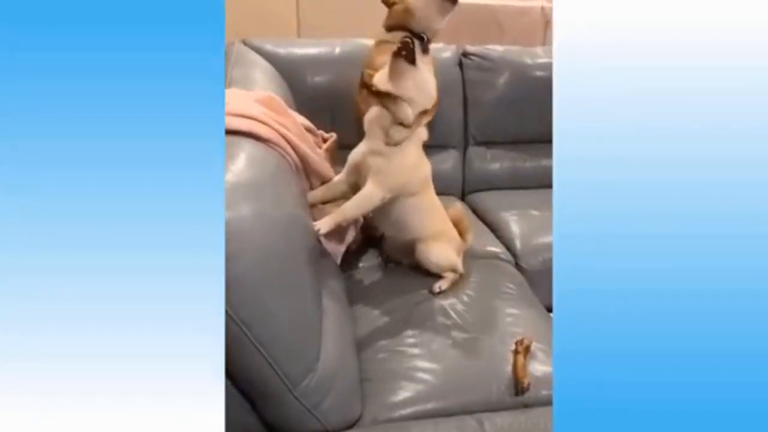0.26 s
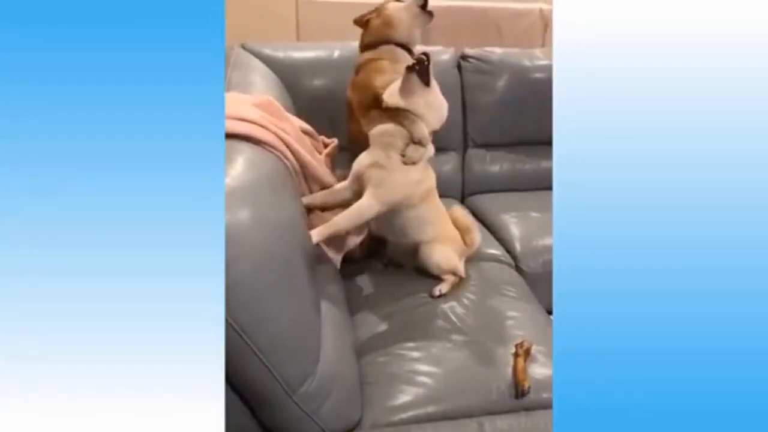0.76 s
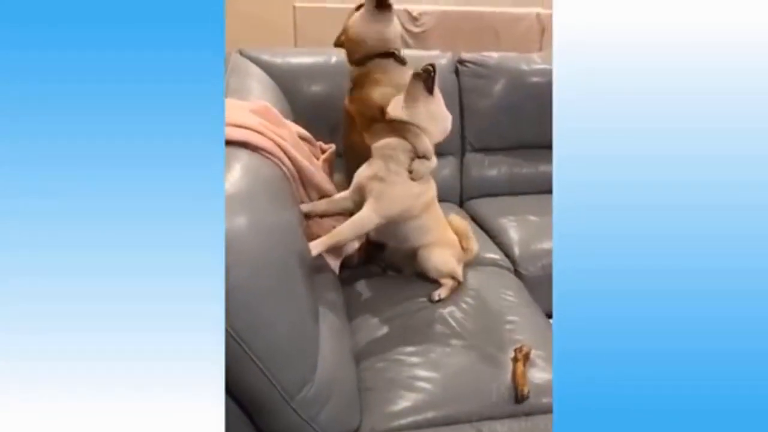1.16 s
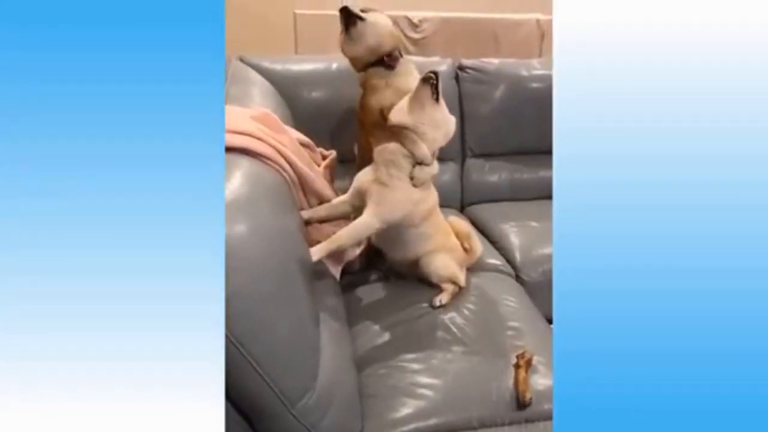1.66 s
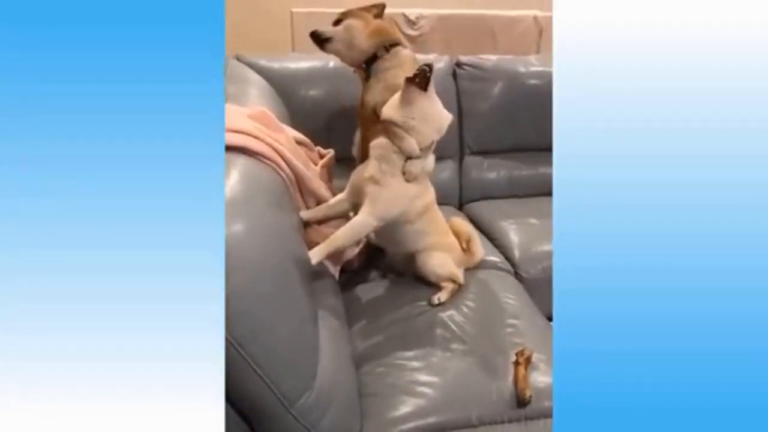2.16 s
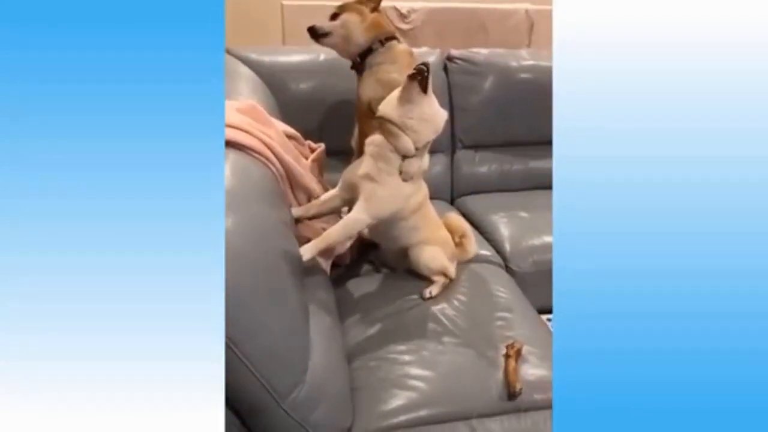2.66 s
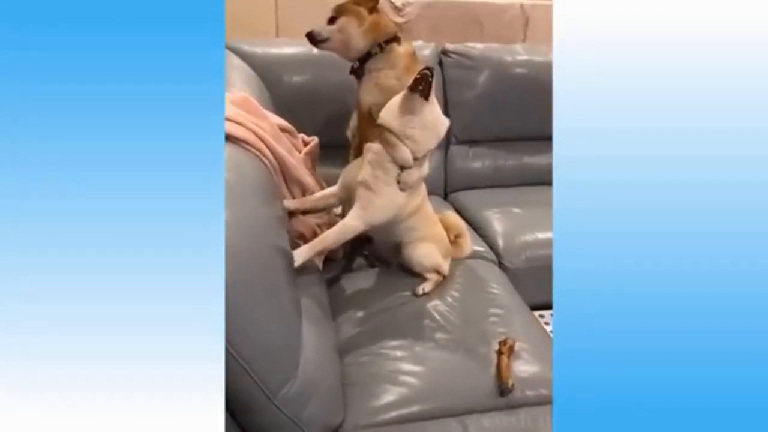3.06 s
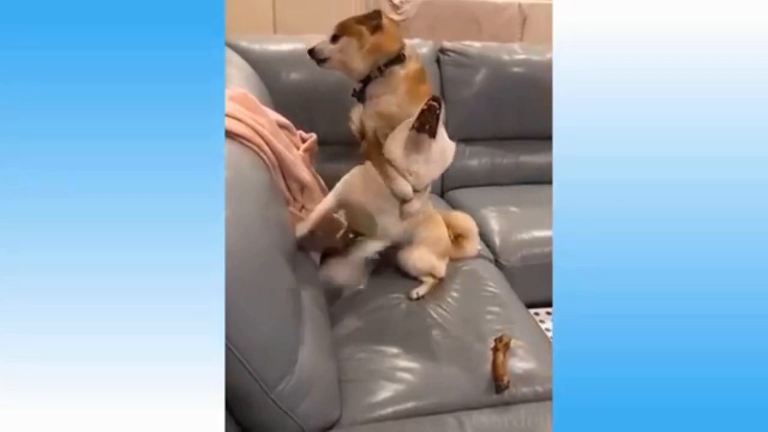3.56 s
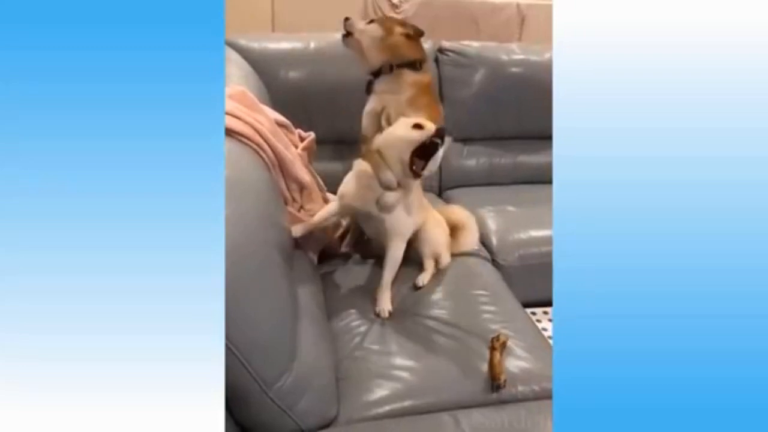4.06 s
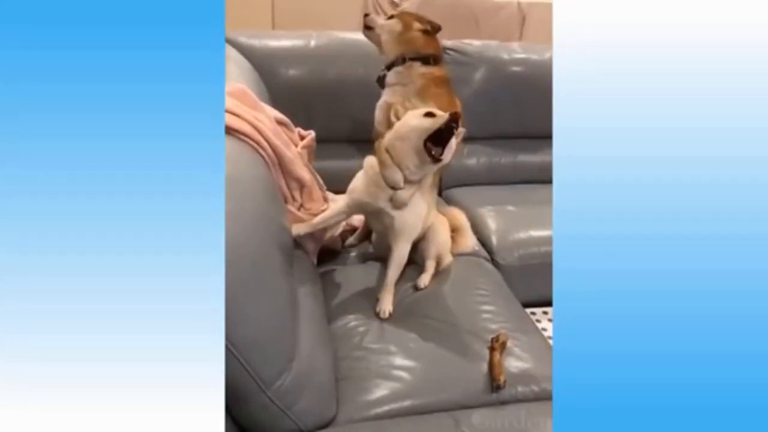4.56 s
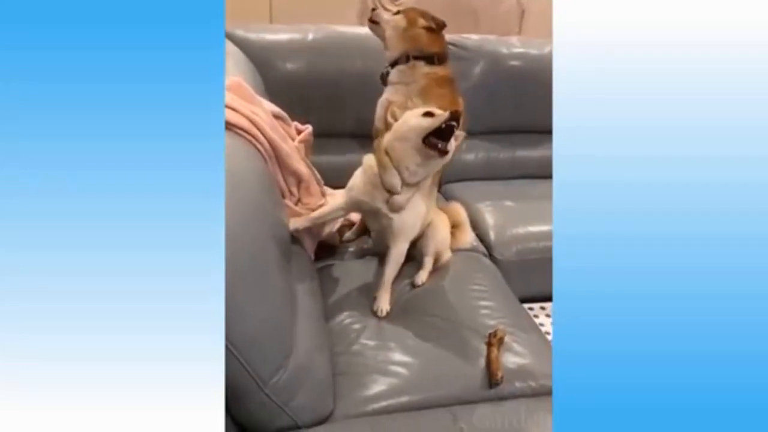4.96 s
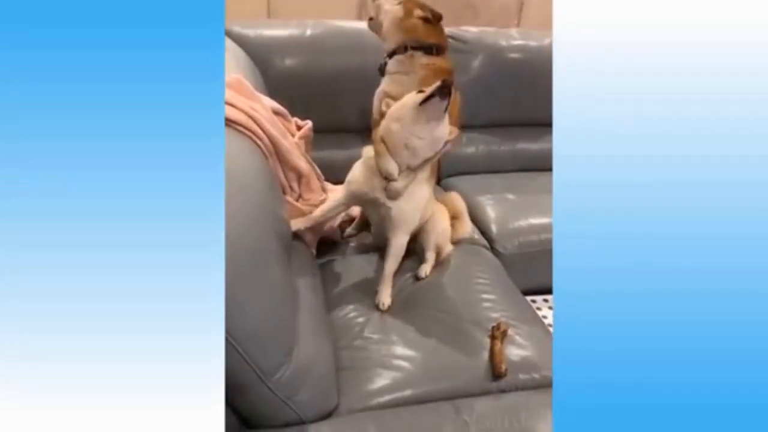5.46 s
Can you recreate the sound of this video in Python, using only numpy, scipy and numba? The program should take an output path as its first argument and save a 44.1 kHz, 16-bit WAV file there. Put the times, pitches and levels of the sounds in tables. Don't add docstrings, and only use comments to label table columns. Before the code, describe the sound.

Two dogs bark loudly in a reverberant living room. The clear front dog opens with two short barks at about 0.1 and 0.4 seconds, each gliding upward. The hoarse rear dog, higher and full of rushing air, answers with five quick yaps from 0.55 to 1.45. The echo rings down over a short pause. From 2.0 to 3.4 the front dog barks about every 0.3 seconds, with one rasping bark from the other at 2.2. At 3.8 a brighter, piercing yelp bursts out, followed by more clear barks until 4.9, with hoarse ones at 3.9 and 4.2. After another ringing gap, a hoarse bark at 5.4 leads into a last rising yelp at 5.5 and a weaker hoarse bark near 5.65. Very faint closed-mouth moans and a low house hush sit underneath. The small microphone overloads on peaks, with slight bass thumps and patchy treble.

```python
import sys
import numpy as np
from scipy import signal
from scipy.fft import rfft, irfft
from scipy.io import wavfile
from scipy.ndimage import uniform_filter1d, minimum_filter1d
from numba import njit

SR = 44100
rng = np.random.default_rng(int(sys.argv[2]) if len(sys.argv) > 2 else 0)


def output_pcm(signal):
    pcm = np.clip(np.atleast_2d(signal).T, -1, 1) * 32767
    wavfile.write(sys.argv[1], SR, np.round(pcm).astype(np.int16))


def amplitude_ratio(level_db):
    exponent = np.asarray(level_db, float) / 20
    return 10 ** exponent


N = 251811

WAKE_S, WAKE_DB, WAKE_PITCH = 0.016, -18, 0.85


def at_hz(points, hz):
    points_hz, values = np.array(points).T
    return np.interp(np.log(hz + 1), np.log(points_hz), values)


def coloured(x, spectrum):
    size = 4096
    hz = np.arange(size // 2 + 1) * SR / size
    cepstrum = irfft(np.log(amplitude_ratio(at_hz(spectrum, hz))))
    cepstrum[1:size // 2] *= 2
    cepstrum[size // 2 + 1:] = 0
    response = irfft(np.exp(rfft(cepstrum)))
    return signal.fftconvolve(x, response)[:len(x)]


def above(x, hz):
    return signal.sosfilt(signal.butter(3, hz, "high", fs=SR, output="sos"), x)


def wobble(rate_hz):
    x = signal.sosfilt(signal.butter(2, rate_hz, fs=SR, output="sos"), rng.standard_normal(N))
    return x / x.std()


def evened(x, span_s):
    return x / np.sqrt(uniform_filter1d(x ** 2, int(span_s * SR)) + 1e-12)


def in_time(calls, fade_s):
    t = np.arange(N) / SR
    point_s, *columns = np.concatenate(calls).T
    controls = [np.interp(t, point_s, column) for column in columns]
    gate = 0
    for call in calls:
        start_s, end_s = call[0][0], call[-1][0]
        gate = gate + np.clip(np.minimum(t - start_s, end_s + fade_s - t) / fade_s, 0, 1)
    starts = np.array([call[0][0] for call in calls])
    which = np.clip(np.searchsorted(starts, t) - 1, 0, None)
    return controls, np.minimum(gate, 1) ** 2, which, t - starts[which]


def quiet_house():
    # (frequency [Hz], level [dB per Hz])
    hush_spectrum = [(30, -41), (100, -24), (200, -12.5), (500, -17), (2000, -15.5), (4200, -20.5),
                     (5200, -39), (13000, -60)]
    quiet = coloured(rng.standard_normal(N), hush_spectrum)
    return amplitude_ratio(-52) * quiet / quiet.std()


@njit
def moving_resonance(x, centre, r):
    y = np.zeros(len(x))
    for i in range(2, len(x)):
        drive = (1 - r * r) / 2 * (x[i] - x[i - 2])
        y[i] = drive + 2 * r * np.cos(centre[i]) * y[i - 1] - r * r * y[i - 2]
    return y


def bark(calls, roughness, throat, jitter, rasp_db, split_hz, mouth):
    controls, gate, which, age_s = in_time(calls, fade_s=0.0098)
    pitch_hz, level_db, bright_db, hiss_db, *mouth_hz = controls
    rough = np.array(roughness)[which] * np.clip(.45 + age_s / .09, 0, 1)

    shake = jitter * rough * wobble(148.78)
    waver = 0.022 * wobble(18)
    phase = 2 * np.pi * np.cumsum(pitch_hz * (1 + shake + waver)) / SR
    pulses = 0
    for k in range(1, 15):
        fade = 1 + (k * pitch_hz / 5760) ** 4
        pulses = pulses + np.cos(k * phase + .12 * k * k) / fade
    pulses *= 1 + rough * np.cos(phase / 2)
    pulses *= amplitude_ratio(4.4 * rough * wobble(51))
    air = rng.standard_normal(N) * (1 + 0.64 * np.cos(phase))
    air *= amplitude_ratio(rasp_db + 1.25 * wobble(133))

    voice = coloured((1 - rough) * pulses + rough * air, throat)
    for centre_hz, (width_hz, gain_db) in zip(mouth_hz, mouth):
        ring = moving_resonance(voice, 2 * np.pi * centre_hz / SR, np.exp(-np.pi * width_hz / SR))
        voice = voice + amplitude_ratio(gain_db) * ring
    voice = evened(voice, span_s=0.064)

    shut_db = -12 * np.exp(-np.maximum(age_s, 0) / 0.016)
    voice = voice + (amplitude_ratio(bright_db + shut_db) - 1) * above(voice, split_hz)
    voice = voice + (amplitude_ratio(hiss_db + shut_db) - 1) * above(voice, 3550)
    return voice * amplitude_ratio(level_db - 3.5) * gate


def rear_calls():
    # (start [s], length [s], peak level [dB], pitch [Hz], brightness [dB])
    rear_barks = [(-0.05, 0.14, -32.5, 840, -0.3), (0.554, 0.14, -9, 789.5, 0.5),
                  (0.729, 0.15, -8.5, 813.5, -0.5), (0.93, 0.13, -12, 911.2, -3.5),
                  (1.078, 0.16, -12, 895, 0.5), (1.295, 0.17, -13.5, 883.7, 1.5),
                  (2.189, 0.15, -7.5, 803.3, -1), (3.915, 0.175, -9, 801.2, -1.5),
                  (4.17, 0.13, -14.5, 813, -10), (5.369, 0.12, -10, 771.4, 0),
                  (5.656, 0.14, -16.5, 714, -1)]
    peak_share, onset_db, end_db = 0.42, -8.5, -7.5
    onset_pitch, end_pitch = 0.99, 1.04
    edge_bright_db, hiss_db, edge_hiss_db = 3.5, -9.5, -15.5
    calls = []
    for s, length, db, hz, bright_db in rear_barks:
        edge_db = bright_db + edge_bright_db
        calls.append([(s - WAKE_S, hz * WAKE_PITCH, db + onset_db + WAKE_DB, bright_db, hiss_db),
                      (s, hz * onset_pitch, db + onset_db, edge_db, edge_hiss_db),
                      (s + peak_share * length, hz, db, bright_db, hiss_db),
                      (s + length, hz * end_pitch, db + end_db, edge_db, edge_hiss_db)])
    return calls


def rear_dog():
    rear_hoarseness = [.6, .85, .65, .75, .65, .65, .6, .45, .7, .45, .6]
    # (frequency [Hz], level [dB per Hz])
    rear_throat = [(88, -104), (150, -37), (322, -23.5), (419, -25.5), (565, -12), (884, 2), (1110, -6),
                   (2250, -14), (2810, -24.5), (3270, -24), (5020, -35.5), (10000, -37.5), (13000, -41)]
    return bark(rear_calls(), rear_hoarseness, rear_throat, jitter=.2, rasp_db=12, split_hz=760, mouth=[])


def front_calls():
    # (start [s], length [s], peak level [dB], top pitch [Hz], lower mouth resonance [Hz])
    front_barks = [(0.128, 0.182, -7, 559, 1770), (0.359, 0.14, -13.5, 548.4, 1980),
                   (1.998, 0.16, -6.5, 531.5, 1956), (2.325, 0.18, -6.5, 544.1, 1939),
                   (2.644, 0.18, -7, 532, 1810), (2.922, 0.2, -7, 544, 1804), (3.219, 0.198, -6, 545, 1795),
                   (4.03, 0.19, -5, 551.3, 1730), (4.254, 0.165, -8, 548, 1694),
                   (4.491, 0.18, -8, 530.4, 1610), (4.744, 0.15, -8.5, 541.1, 1706)]
    # (time [s], pitch [Hz], level [dB], brightness [dB], lower mouth resonance [Hz])
    clear_yelp = [
        (3.775, 330.6, -39, 1, 1720),
        (3.8, 394, -9.5, 0, 1719),
        (3.826, 501.2, -4.5, 2, 1980),
        (3.86, 511, -4, 10.5, 1580),
        (3.872, 553.2, -1, 12, 1626),
        (3.905, 543.6, -14.5, -6, 1650),
        (3.94, 533.4, -9.5, -2, 1653),
    ]
    # (time [s], pitch [Hz], level [dB], brightness [dB], lower mouth resonance [Hz])
    last_yelp = [
        (5.481, 424, -22, 1.5, 1780),
        (5.495, 455, -7.5, 3.2, 1759),
        (5.52, 514, -5, 6.4, 1730),
        (5.565, 574.5, -7, 1.5, 1680),
        (5.64, 554.6, -14, 1.5, 1710),
        (5.71, 520.3, -18, 1.5, 1700),
    ]
    attack_s, crest_s, onset_db, crest_db, sag_db_per_s = 0.045, 0.08, -12, -1, -66
    onset_pitch, attack_pitch, end_pitch = 0.74, 0.93, 0.94
    jaw_closes_hz_per_s, upper_mouth_hz, upper_lift_hz = 1500, 2806, 80
    bright_db, hiss_db = 2, -8.5

    calls = []
    for yelp in (clear_yelp, last_yelp):
        calls.append([(s, hz, db, yelp_bright_db, 0, mouth_hz, max(upper_mouth_hz, 5.9 * hz))
                      for s, hz, db, yelp_bright_db, mouth_hz in yelp])
    for s, length, db, hz, mouth_hz in front_barks:
        sag_db = sag_db_per_s * (length - crest_s)
        # (age [s], share of top pitch, level change [dB], lift of the upper resonance [Hz])
        shape = [(-WAKE_S, WAKE_PITCH * onset_pitch, WAKE_DB + onset_db, 0),
                 (0, onset_pitch, onset_db, 0),
                 (attack_s, attack_pitch, 0, 0),
                 (crest_s, 1, crest_db, upper_lift_hz),
                 (length, end_pitch, crest_db + sag_db, 0)]
        calls.append([(s + age, hz * share, db + change_db, bright_db, hiss_db,
                       mouth_hz - jaw_closes_hz_per_s * max(age - attack_s, 0), upper_mouth_hz + lift_hz)
                      for age, share, change_db, lift_hz in shape])
    return sorted(calls)


def front_dog():
    front_hoarseness = [.42, .7, .48, .48, .44, .44, .42, .13, .45, .66, .6, .6, .2]
    # (frequency [Hz], level [dB per Hz])
    front_throat = [(88, -50), (150, -61.5), (435, -30.5), (524, -24), (608, -17.5), (820, -15), (1070, -1),
                    (1310, -7), (1640, -15), (2330, -17.5), (3270, -22.5), (5310, -36.5), (6890, -36.5),
                    (9640, -32), (13000, -43.5)]
    # (frequency [Hz], change [dB])
    facing_tone = [(2050, -0.5), (2350, -4.5), (2650, -1), (4300, 2.5), (5400, -11.5), (6500, 5.5),
                   (8000, 1.5), (12000, -4)]
    turn_s = 3.7
    voice = bark(front_calls(), front_hoarseness, front_throat, jitter=.12, rasp_db=9, split_hz=1760,
                 mouth=[(200, 9.8), (400, 0.9)])
    return np.where(np.arange(N) < turn_s * SR, voice, coloured(voice, facing_tone))


def moan_calls():
    # (start [s], length [s], first pitch [Hz], last pitch [Hz], peak level [dB])
    soft_moans = [(0.236, 0.3, 185, 329, -50.5), (1.4, 0.13, 260, 245.3, -52), (2.422, 0.23, 180, 228, -51),
                  (2.842, 0.14, 232, 255, -52), (3.101, 0.13, 260, 212, -50.5),
                  (3.41, 0.1, 262, 173.6, -54), (3.633, 0.16, 199, 212, -66),
                  (4.347, 0.17, 182, 281.8, -54), (4.65, 0.17, 290, 271.8, -54),
                  (4.917, 0.097, 260, 211.5, -51), (5.039, 0.11, 222, 193.2, -56)]
    edge_db, overtone_db = -2, -4.5
    return [[(s, first_hz, db + edge_db, overtone_db),
             (s + length / 2, (first_hz + last_hz) / 2, db, overtone_db),
             (s + length, last_hz, db + edge_db, overtone_db)]
            for s, length, first_hz, last_hz, db in soft_moans]


def moans():
    (pitch_hz, level_db, over_db), gate, *_ = in_time(moan_calls(), fade_s=0.0057)
    phase = 2 * np.pi * np.cumsum(pitch_hz * (1 + 0.013 * wobble(38))) / SR
    overtones = np.sin(2 * phase) + .3 * np.sin(3 * phase)
    hum = np.sin(phase) + amplitude_ratio(over_db) * overtones
    return hum * amplitude_ratio(level_db + 4 + 3 * wobble(30)) * gate


def room(x):
    # (frequency [Hz], time [s])
    echo_times = [(150, 1), (500, 0.97), (1000, 0.91), (2000, 0.84), (4000, 0.77), (8000, 0.91),
                  (12000, 0.43)]
    first_wall_s, build_up_s = 0.0049, 0.0075
    t = np.arange(int(1.3 * SR)) / SR
    band_edges = 100 * 2 ** np.arange(0, 7.6, .5)
    white = rng.standard_normal((2, len(t)))
    tail = 0
    for k, (low, high) in enumerate(zip(band_edges, band_edges[1:])):
        band = signal.sosfilt(signal.butter(2, [low, high], "band", fs=SR, output="sos"), white[k % 2])
        tail = tail + band * amplitude_ratio(-60 * t / at_hz(echo_times, np.sqrt(low * high)))
    tail *= np.clip((t - first_wall_s) / build_up_s, 0, 1)
    return signal.fftconvolve(x, tail / np.sqrt(np.sum(tail ** 2)))[:N]


def puffs(voices):
    loudness = np.sqrt(np.abs(uniform_filter1d(voices ** 2, int(0.068 * SR))))
    low = coloured(rng.standard_normal(N),
                   [(25, -4), (100, -5.5), (250, 11.5), (450, 2.5), (700, -26.0), (2000, -61)])
    return amplitude_ratio(-42 + 0.77 * wobble(1.7)) * loudness * low / low.std()


def scene():
    quiet = quiet_house()
    voices = rear_dog() + front_dog()
    hum = moans()
    echo = amplitude_ratio(-3) * room(voices + amplitude_ratio(-20) * hum)
    air = puffs(voices + echo)
    return (voices + echo + hum + air + quiet)[None]


def overloaded(x):
    push = x ** 4 / (1 + x ** 4)
    thump = signal.sosfilt(signal.butter(2, 160, fs=SR, output="sos"), push)
    bass_cut = signal.butter(2, 47, "high", fs=SR, output="sos")
    return signal.sosfilt(bass_cut, x + amplitude_ratio(-23) * thump)


def blotched(x, from_hz, blotch_db, hole_db, rarity):
    hz, _, tiles = signal.stft(x, SR, nperseg=512)
    chance = uniform_filter1d(rng.standard_normal(tiles.shape), size=5, axis=0)
    chance = uniform_filter1d(chance, size=5, axis=1)
    chance /= chance.std()
    height = np.clip((hz[:, None] - from_hz) / 9000, 0, 1)
    muted = np.clip(3 * (1.8 * height - rarity - chance), 0, 1) * (height > 0)
    blotches = blotch_db * chance * np.minimum(4 * height, 1)
    gain = amplitude_ratio(blotches + hole_db * muted)
    return signal.istft(tiles * gain, SR, nperseg=512)[1][:N]


def limited(x, hold_s):
    ceiling = .93
    size = int(hold_s * SR)
    allowed = minimum_filter1d(np.minimum(1, ceiling / (np.abs(x) + 1e-9)), size)
    return x * uniform_filter1d(allowed, size)


def top_cut(x):
    return signal.sosfilt(signal.butter(12, 13170, fs=SR, output="sos"), x)


def record(dry):
    thin = overloaded(dry[0] * amplitude_ratio(1))
    blotchy = blotched(thin, from_hz=3800, blotch_db=3.5, hole_db=-25, rarity=2.25)
    mix = limited(blotchy, hold_s=0.0011)[None]
    return top_cut(mix)


dry = scene()
out = record(dry)
output_pcm(out)
```